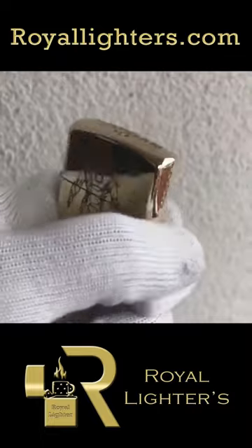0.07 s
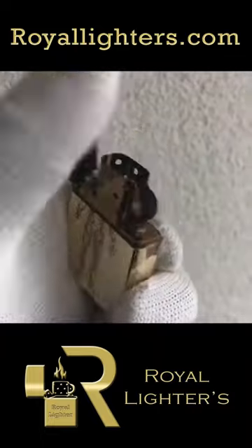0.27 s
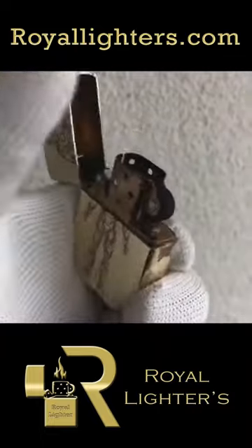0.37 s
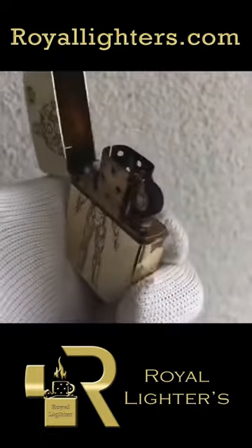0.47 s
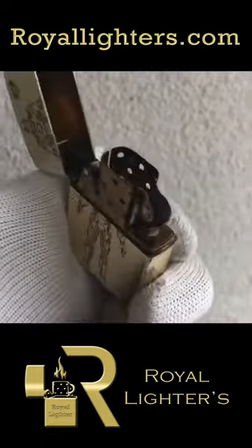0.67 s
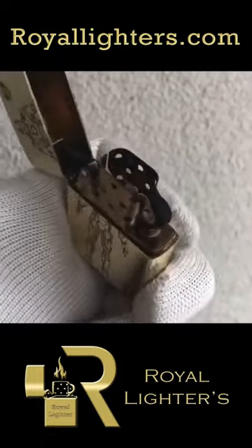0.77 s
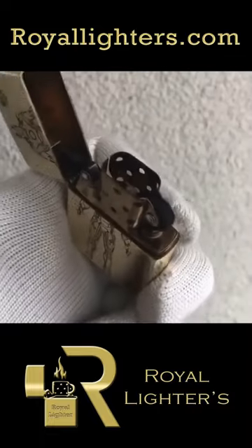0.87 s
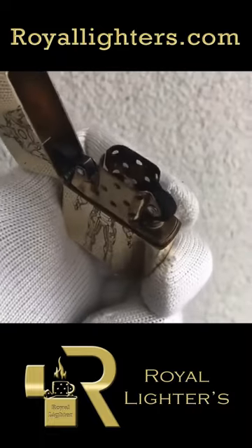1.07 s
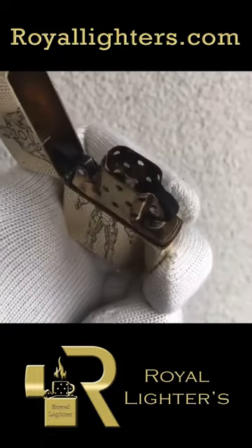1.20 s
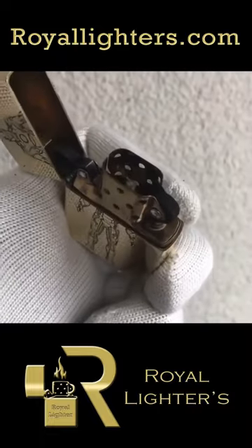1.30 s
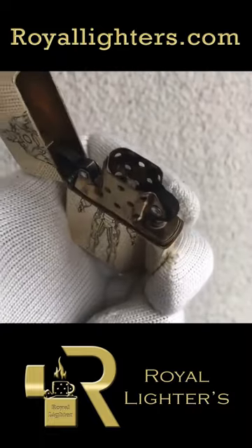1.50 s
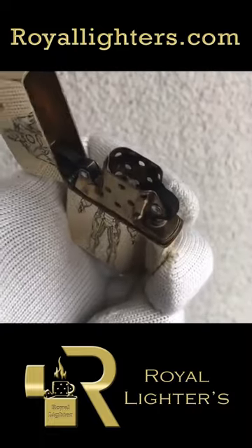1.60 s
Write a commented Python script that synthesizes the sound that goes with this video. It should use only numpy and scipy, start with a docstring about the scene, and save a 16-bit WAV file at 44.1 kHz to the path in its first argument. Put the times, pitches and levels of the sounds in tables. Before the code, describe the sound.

The lid of a metal lighter ticks loose and snaps open with a short, bright ring. Muffled rubbing and soft knocks follow as a gloved hand shifts its grip, heard up close indoors over faint room noise.

```python
"""Indoors, a gloved hand flips open a metal lighter close to the microphone.
The lid unseats with a tick and the hinge scrapes by stick-slip friction. The lid's impact on its stop
gives a crack, a thump and a short ring of its normal modes. Then the glove rubs and bumps dully as the
grip shifts. A limiter ducks the level at the snap and recovers slowly."""
import sys
import numpy as np
from scipy import signal
from scipy.fft import rfft, irfft
from scipy.io import wavfile
from scipy.ndimage import uniform_filter1d, minimum_filter1d

SR = 44100
rng = np.random.default_rng(int(sys.argv[2]) if len(sys.argv) > 2 else 0)


def persist_wave(psi):
    """Save psi, clipped to +-1, as 16-bit WAV."""
    counts = np.round(np.clip(psi, -1, 1) * 32767).astype(np.int16)
    wavfile.write(sys.argv[1], SR, np.atleast_2d(counts).T)


N = 72765
T = np.arange(N) / SR


def from_db(db):
    """Amplitude ratio of a level in decibels."""
    return 10 ** (np.asarray(db) / 20)


def curve(rows):
    """Linear interpolation between (t/s, value) rows."""
    return np.interp(T, *np.transpose(rows))


def butterworth(x, order, hz, kind):
    """Maximally flat low-pass or high-pass filtering."""
    return signal.sosfilt(signal.butter(order, hz, kind, fs=SR, output="sos"), x)


def colour(x, spectrum):
    """Source-filter model: weight an excitation by (f/Hz, level/dB) rows, then scale to rms 1."""
    hz, db = np.transpose(spectrum)
    bin_hz = np.maximum(np.arange(N // 2 + 1) * SR / N, 1)
    gain = from_db(np.interp(np.log(bin_hz), np.log(hz), db))
    shaped = irfft(rfft(x) * gain, N)
    return shaped / np.sqrt(np.mean(shaped ** 2) + 1e-20)


def noise(spectrum):
    """Filtered Gaussian noise of rms 1."""
    return colour(rng.standard_normal(N), spectrum)


def even(x, span_s):
    """Division by the running rms evens out swells longer than the span."""
    power = uniform_filter1d(x ** 2, max(int(span_s * SR), 2))
    return x / np.sqrt(np.abs(power) + 1e-9)


def grains(per_s, spread_db=3):
    """Poisson process: tiny impulses of random size and sign."""
    sizes = from_db(spread_db * np.minimum(rng.exponential(1, N), 4))
    signs = rng.choice([-1, 1], N)
    return sizes * signs * (rng.random(N) < per_s / SR)


def impulses(events):
    """Ideal impacts: one impulse for each (t/s, level/dB) row."""
    out = np.zeros(N)
    for at_s, db in events:
        out[int(at_s * SR)] += from_db(db)
    return out


def decay(age_s, t60_s):
    """Exponential damping: 1 until age zero, then 60 dB down every t60_s."""
    return np.exp(-np.log(1000) * np.maximum(age_s, 0) / t60_s)


def hit_envelope(hits, t60_s):
    """First-order response: a jump at each impulse, then exponential decay."""
    return signal.lfilter([1], [1, -decay(1 / SR, t60_s)], hits + 1e-18)


def ring(hits, modes):
    """Modal superposition: impulses excite a damped sinusoid for each (f/Hz, level/dB, T60/s) row."""
    out = np.zeros(N)
    for hz, db, t60_s in modes:
        radius, angle = decay(1 / SR, t60_s), 2 * np.pi * hz / SR
        feedback = [1, -2 * radius * np.cos(angle), radius ** 2]
        out += from_db(db) * signal.lfilter([0, np.sin(angle)], feedback, hits + 1e-18)
    return out


# Spectrum of the room's background: f/Hz, relative level/dB
ROOM_SPECTRUM = [(20, 2), (60, 3.5), (140, -8), (390, -8), (530, -15), (750, -11.5), (1500, -19.5),
                 (2500, -28.5), (4000, -31.5), (5500, -40.5), (8000, -42.5), (12500, -46), (15000, -62)]
def room_tone():
    """Stationary noise, strongest in the bass."""
    return from_db(-37) * noise(ROOM_SPECTRUM)


# Envelope of the handling rumble: t/s, level/dB
RUMBLE_ENVELOPE = [(0, -28), (.2, -30.5), (.35, -28.5), (.45, -16), (.53, -19), (.62, -18), (.72, -21.5),
                   (.83, -23), (.89, -42.5), (1.03, -31.5), (1.18, -33.5), (1.24, -20), (1.285, -26.5),
                   (1.32, -13.5), (1.355, -33), (1.39, -16.5), (1.44, -40.5), (1.52, -19), (1.58, -29.5),
                   (1.65, -26)]
# Its spectrum: f/Hz, relative level/dB
RUMBLE_SPECTRUM = [(12, -41.5), (30, -33), (48, 9), (68, 12), (95, 3), (150, -11.5), (400, -78)]
def hand_rumble():
    """Amplitude-modulated noise: a deep rumble swells as the hand moves."""
    return from_db(curve(RUMBLE_ENVELOPE)) * even(noise(RUMBLE_SPECTRUM), span_s=0.044)


# Strength of the rubbing: t/s, level/dB
RUB_ENVELOPE = [(0, -43), (.03, -32), (.1, -40), (.17, -52.5), (.23, -24), (.26, -26.5), (.35, -41.5),
                (.41, -22), (.44, -15.5), (.47, -29.5), (.535, -25.5), (.575, -9.5), (.64, -11), (.7, -27),
                (.78, -25.5), (.87, -42.5), (1.195, -42), (1.228, -21), (1.27, -38), (1.32, -26.5),
                (1.35, -39.5), (1.39, -32.5), (1.44, -54), (1.475, -31.5), (1.55, -41.5), (1.65, -31.5)]
# Spectrum of its dull body: f/Hz, relative level/dB
BODY_SPECTRUM = [(60, -4), (110, 3.5), (190, 6), (340, -1), (500, -20), (800, -23.5), (1500, -60),
                 (4000, -111.5)]
# Spectrum of the knit's rasp: f/Hz, relative level/dB
RASP_SPECTRUM = [(200, 0), (400, 11.5), (650, -0.5), (1000, -11), (1300, -22.5), (1700, -29), (2500, -46.5),
                 (6000, -66)]
def glove_rub(rasp_exponent=1.78):
    """Friction noise: fibres catch and slip, and their rasp grows with pressure faster than the body."""
    rub_db = curve(RUB_ENVELOPE)
    body = even(noise(BODY_SPECTRUM), span_s=0.015)
    rasp = even(colour(grains(per_s=650), RASP_SPECTRUM), span_s=0.042)
    return from_db(rub_db) * body + from_db(2.5 + rasp_exponent * rub_db) * rasp


# Finger knocks: t/s, pulse level/dB, f/Hz, level of the push on the hand/dB
KNOCKS = [(0.0286, -20, 340, -13.5), (0.075, -18.5, 425, -14), (0.192, -21.5, 180, -18),
          (0.228, -17, 265, -8), (0.316, -14.5, 376, -15.5), (0.378, -5, 486, -3.5),
          (0.4375, -3.5, 200, -12), (0.4439, -3, 342, -14), (0.568, -5.5, 233, -6.5),
          (0.5849, -7, 620, -6.5), (0.6225, -3, 504, -2.5), (0.64, -4.5, 422, -14), (0.665, -3, 240, -7),
          (0.678, -10, 380, -20), (0.714, -8.5, 390, -3), (0.773, -18.5, 373, -10), (1.234, -13, 224, -10),
          (1.3154, -8.5, 114, -16.5), (1.39, -19, 88, -22), (1.578, -51, 255, -17),
          (1.638, -15.5, 126, -31)]
# Modes of the hand: f/Hz, level/dB, T60/s
HAND_RESONANCES = [(144.7, -11, 0.15), (194, -4, 0.04), (330, -16, 0.032)]
def finger_bumps(width_cycles=0.31, padding_hz=530):
    """Cushioned impact: each knock is one rounded push and pull, and excites the hand's modes."""
    pushes = impulses([(at_s, push_db) for at_s, _, _, push_db in KNOCKS])
    out = butterworth(ring(pushes, HAND_RESONANCES), 2, padding_hz, "low")
    for at_s, db, hz, _ in KNOCKS:
        cycles = (T - at_s) * hz
        out += from_db(db) * np.exp(-(cycles / width_cycles) ** 2) * np.sin(2 * np.pi * cycles)
    return out


# Spectrum of metal friction: f/Hz, relative level/dB
FRICTION_SPECTRUM = [(1200, -43), (2400, 10.5), (3600, -11.5), (5400, -10), (8000, -6), (12500, -9),
                     (14500, -35)]
def hinge_scrape(from_s=0.224, to_s=0.31):
    """Stick-slip friction: tiny slips of the swinging lid scrape and faintly ring its middle modes."""
    slips = grains(per_s=810)
    swinging = (T > from_s) & (T < to_s)
    scrape = colour(slips, FRICTION_SPECTRUM) * swinging
    singing = lid_ring(slips * swinging, MIDDLE_BAND_HZ)
    return from_db(-47) * scrape + from_db(-39.5) * singing


# The lid unseating and small contacts of the cam: t/s, level/dB
CAM_CONTACTS = [(0.2123, -17), (0.2129, -15), (0.2152, -23.5), (0.2335, -34), (0.2395, -34), (0.242, -38),
                (0.2528, -28.5), (0.2542, -34), (0.334, -34)]
# Modes of the hand-held case: f/Hz, level/dB, T60/s
CASE_RESONANCES = [(1810, -15, 0.0125), (2035, -6, 0.014), (2360, -11.5, 0.014), (4510, -20, 0.021),
                   (5250, -12, 0.018), (5390, -8.5, 0.013), (6500, -36.5, 0.014), (7500, -20, 0.0093),
                   (11700, -25.5, .008), (12700, -11, 0.006)]
def cam_ticks():
    """Damped impulse response: gritty contacts ring the case, whose vibration the hand absorbs."""
    hits = impulses(CAM_CONTACTS)
    grit = from_db(-17.5) * hit_envelope(hits, t60_s=0.018) * noise(FRICTION_SPECTRUM)
    return butterworth(ring(hits, CASE_RESONANCES) + grit, 4, 1560, "high")


# Spectrum of the jangle after the impact: f/Hz, relative level/dB
JANGLE_SPECTRUM = [(500, 7), (1500, 2), (3500, -9), (4600, -16), (6000, -12.5), (7800, -17.5), (8700, 8.5),
                   (9800, -7), (11300, 2), (13000, 2), (15000, -18)]
def jangle(count=44, low_hz=2600, high_hz=14320):
    """Inharmonic vibration: many unrelated partials of thin metal parts, with fine contact chatter."""
    pitches = low_hz + (high_hz - low_hz) * (np.arange(count) + rng.random(count)) / count
    partials = sum(np.sin(2 * np.pi * (hz * T + rng.random())) for hz in pitches)
    chatter = colour(grains(per_s=670), JANGLE_SPECTRUM)
    return colour(partials, JANGLE_SPECTRUM) + from_db(-8.5) * chatter


LOW_BAND_HZ, MIDDLE_BAND_HZ, HIGH_BAND_HZ = (0, 3000), (3000, 8100), (8100, SR / 2)
# Modes of the open lid: f/Hz, level/dB, T60/s
LID_RESONANCES = [(1690, -47, .15), (2098, -25.5, .29), (2133, -32, .13), (4000, -46, .12),
                  (4845, -23.5, .055), (6679, -26.5, .235), (6707, -29.5, .19), (7660, -47, .28),
                  (8660, -42, .1), (8866, -41, .1), (9270, -39, .11), (10508, -27, .17), (11630, -38, .14),
                  (12345, -35, .09), (13953, -38, .12)]
def lid_ring(hits, band_hz):
    """Free vibration of the lid's modes within one band; close pairs beat."""
    low_hz, high_hz = band_hz
    return ring(hits, [mode for mode in LID_RESONANCES if low_hz <= mode[0] < high_hz])


# The lid hits its stop, then rebounds: t/s, level/dB
LID_IMPACTS = [(0.2651, 10.5), (0.2712, -25), (0.2786, -22.5)]
# Spectrum of the impact's crack: f/Hz, relative level/dB
CRACK_SPECTRUM = [(500, 10), (1500, -0.5), (2100, 4), (3000, -8.5), (4200, 6.5), (5000, -5), (7000, -6.5),
                  (8700, -2), (10000, -23), (12500, 13), (13600, -5), (15000, -18)]
def lid_snap(choke_at_s=0.305, drop_at_s=0.313, drop_s=0.00367, drop_db=-10.5):
    """Hard impact: brief metal contact excites a broad band, heard as a crack, a jangle and a ring."""
    hits, first_hit = impulses(LID_IMPACTS), impulses(LID_IMPACTS[:1])
    crack_noise = even(noise(CRACK_SPECTRUM), span_s=0.00062)
    crack = from_db(-6.5) * hit_envelope(hits, t60_s=0.0029) * crack_noise
    shimmer = from_db(-27.5) * hit_envelope(hits, t60_s=0.092) * jangle()
    # The glove settles on the lid and damps its lowest modes.
    choke = decay(T - choke_at_s, t60_s=0.11)
    # The jangle and the highest modes hold briefly, then drop away.
    drop = from_db(drop_db * np.clip((T - drop_at_s) / drop_s, 0, 1))
    low = choke * lid_ring(first_hit, LOW_BAND_HZ)
    middle = lid_ring(first_hit, MIDDLE_BAND_HZ)
    high = drop * lid_ring(hits, HIGH_BAND_HZ)
    return crack + drop * shimmer + from_db(-2) * (low + middle + high)


def snap_thump(floor_hz=26.1, sweep_cycles=0.46, sweep_s=0.00015, rise_s=0.011, hold_s=0.0167):
    """Downward chirp: the jolt of the snap is a heavy pulse whose pitch plunges into the bass."""
    start_s, impact_db = LID_IMPACTS[0]
    age = np.maximum(T - start_s, 0)
    cycles = floor_hz * age + sweep_cycles * np.log1p(age / sweep_s)
    rise = 1 - 0.46 * np.exp(-age / rise_s)
    release = decay(age - hold_s, t60_s=0.059)
    return from_db(impact_db - 0.5) * rise * release * np.sin(2 * np.pi * cycles)


def scene():
    """Linear superposition of room, hand and lighter, in mono."""
    room = room_tone()
    lighter = cam_ticks() + hinge_scrape() + lid_snap() + snap_thump()
    handling = butterworth(glove_rub() + hand_rumble(), 2, 26, "high")
    return (room + handling + finger_bumps() + lighter)[None]


def record(dry):
    """Look-ahead limiting with slow recovery, then band limiting by a steep low-pass filter."""
    threshold_db, ahead_s, recovery_s, cutoff_hz = 1, 0.00068, 0.43, 15100
    over_db = np.maximum(20 * np.log10(np.abs(dry[0]) + 1e-9) - threshold_db, 0)
    recovery = np.exp(-T / recovery_s)
    duck_db = np.maximum.accumulate(over_db / recovery) * recovery  # decaying peak hold
    ahead = int(ahead_s * SR)
    gain_db = uniform_filter1d(minimum_filter1d(-duck_db, 2 * ahead), ahead)
    low_pass = signal.ellip(10, 0.1, 80, cutoff_hz, fs=SR, output="sos")
    return signal.sosfilt(low_pass, dry * from_db(gain_db))


dry = scene()
out = record(dry)
persist_wave(out)
```